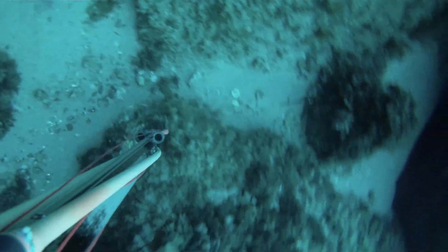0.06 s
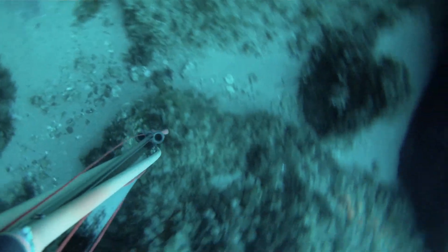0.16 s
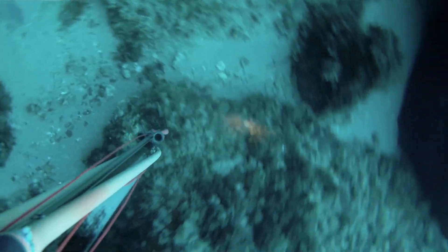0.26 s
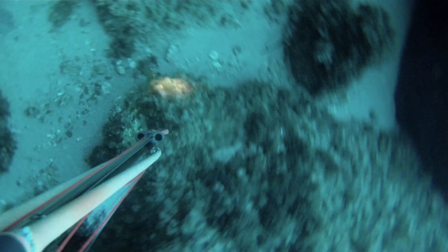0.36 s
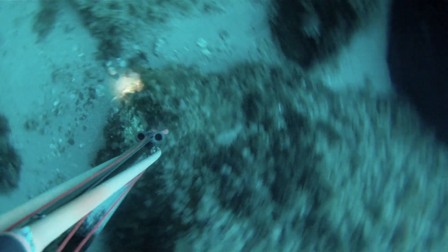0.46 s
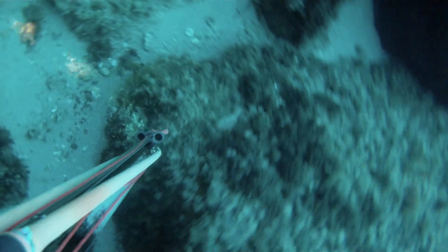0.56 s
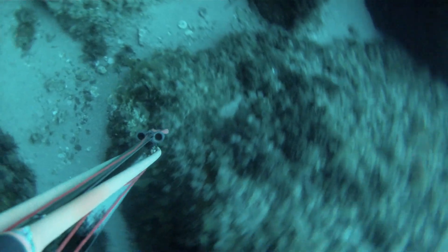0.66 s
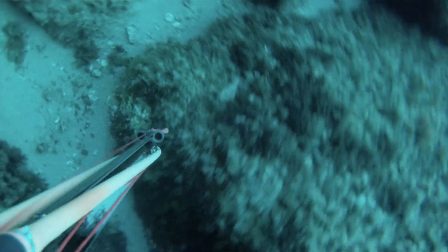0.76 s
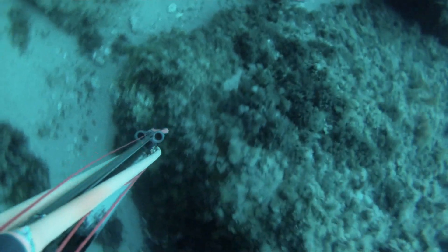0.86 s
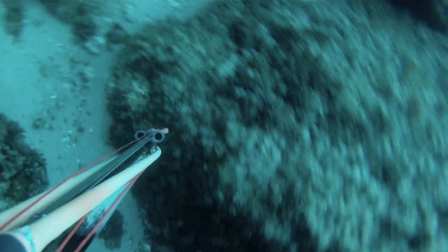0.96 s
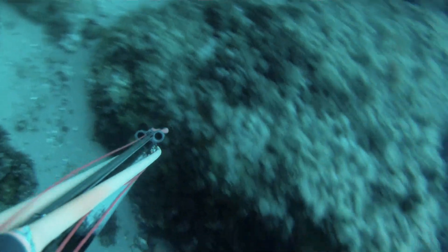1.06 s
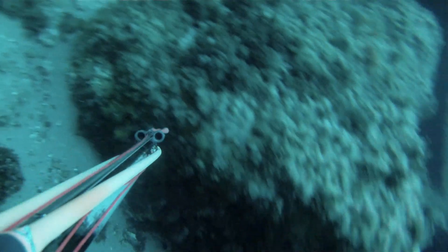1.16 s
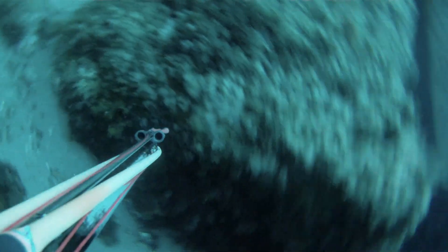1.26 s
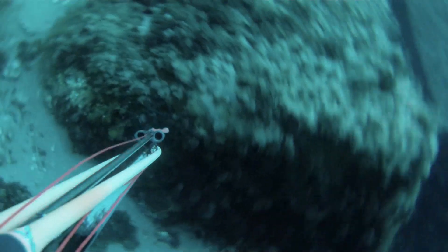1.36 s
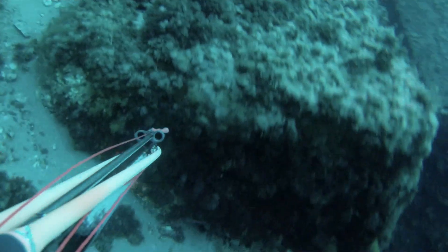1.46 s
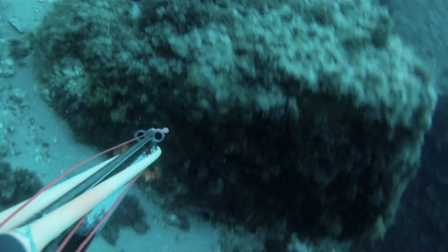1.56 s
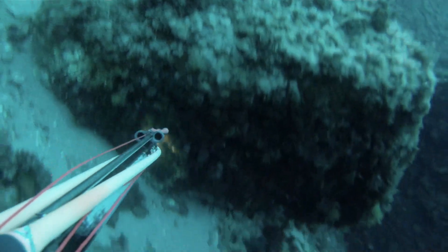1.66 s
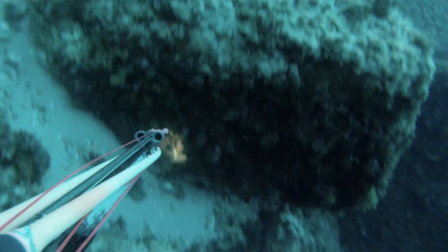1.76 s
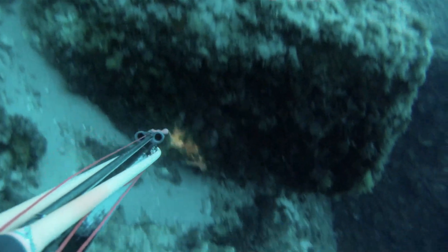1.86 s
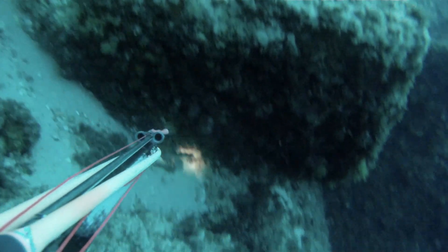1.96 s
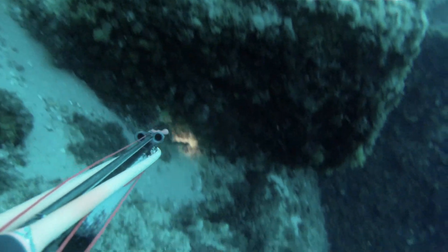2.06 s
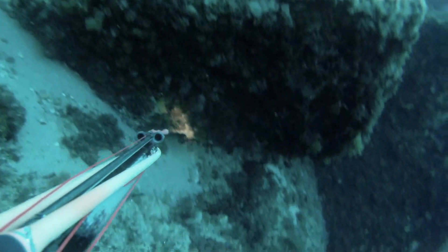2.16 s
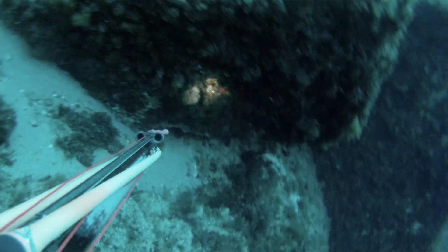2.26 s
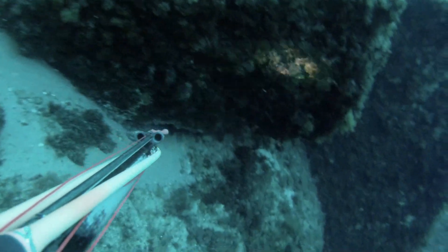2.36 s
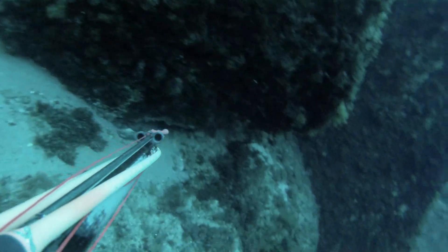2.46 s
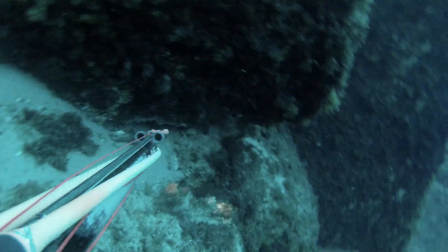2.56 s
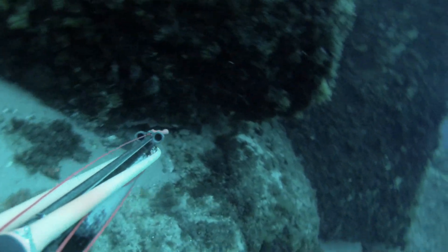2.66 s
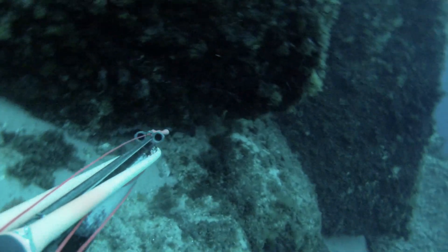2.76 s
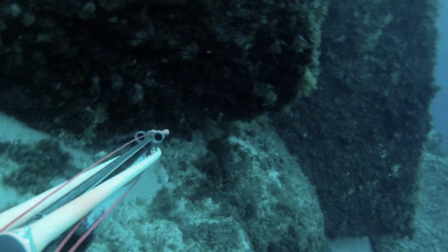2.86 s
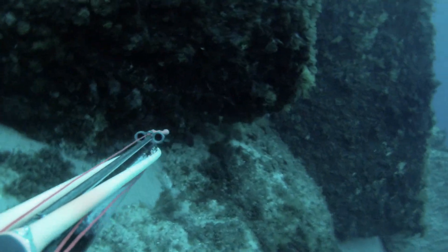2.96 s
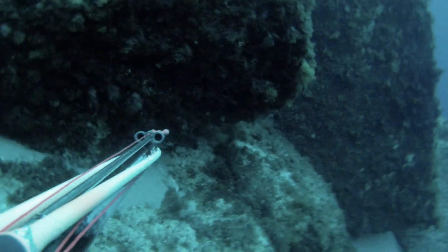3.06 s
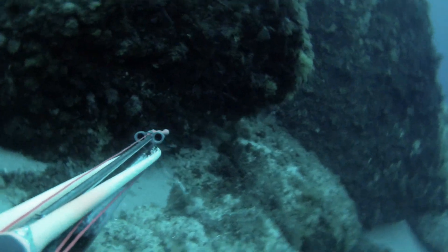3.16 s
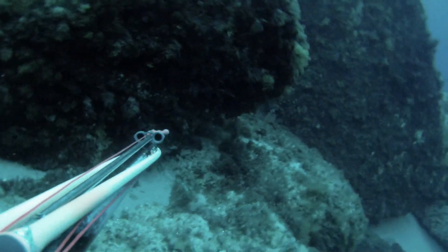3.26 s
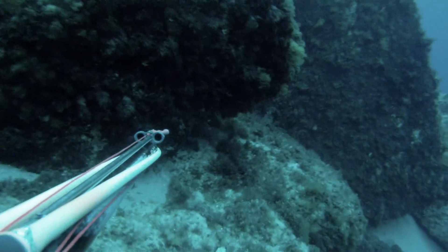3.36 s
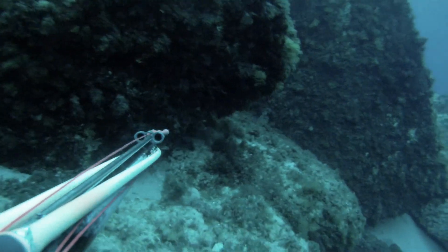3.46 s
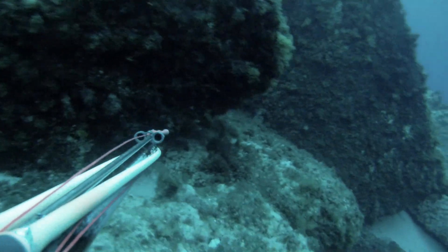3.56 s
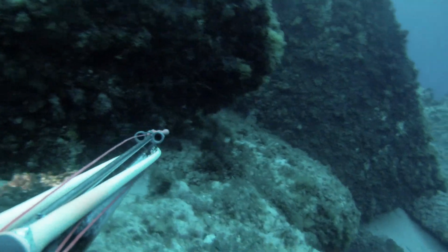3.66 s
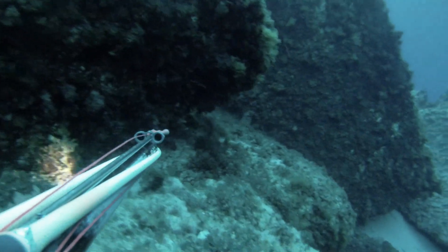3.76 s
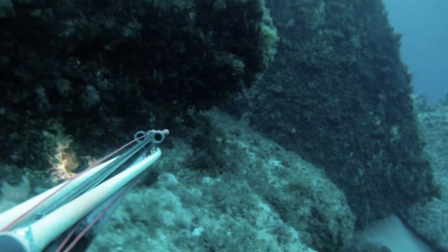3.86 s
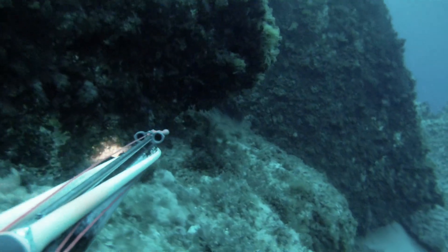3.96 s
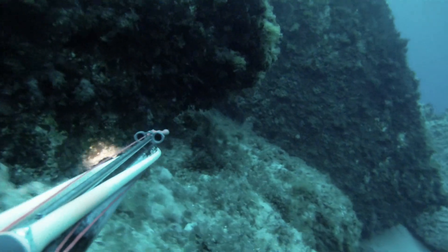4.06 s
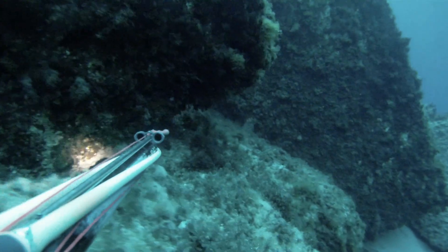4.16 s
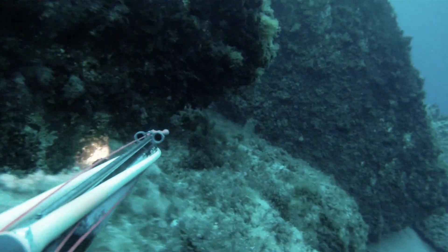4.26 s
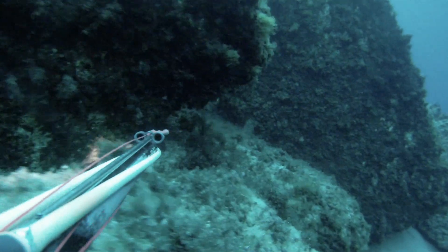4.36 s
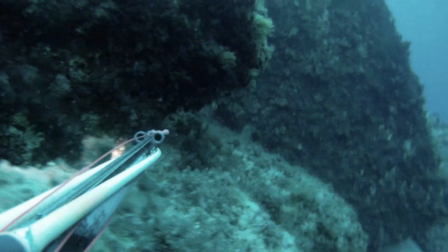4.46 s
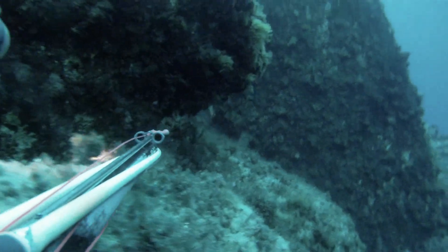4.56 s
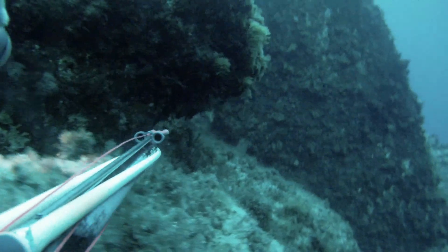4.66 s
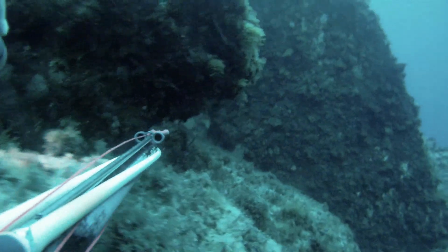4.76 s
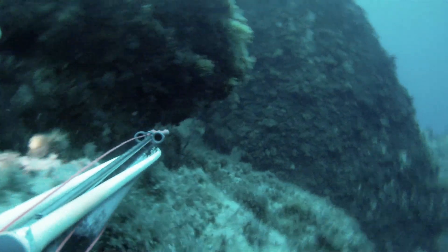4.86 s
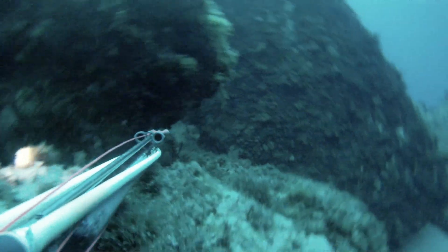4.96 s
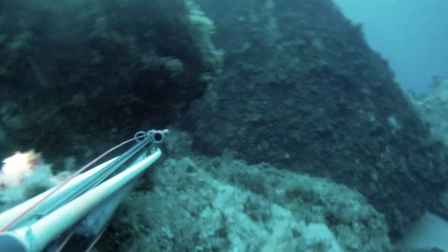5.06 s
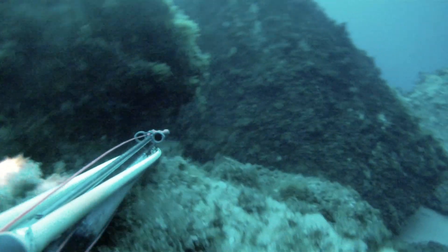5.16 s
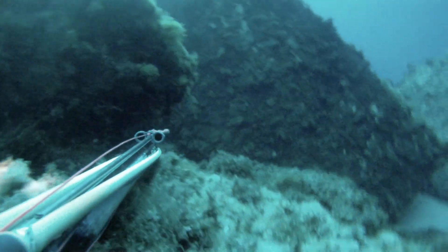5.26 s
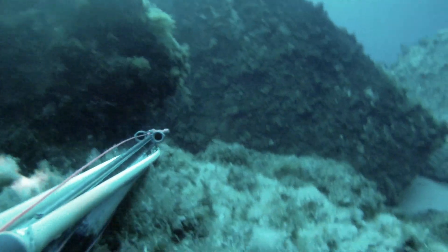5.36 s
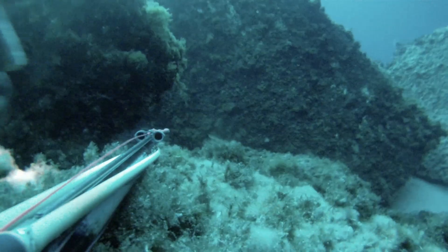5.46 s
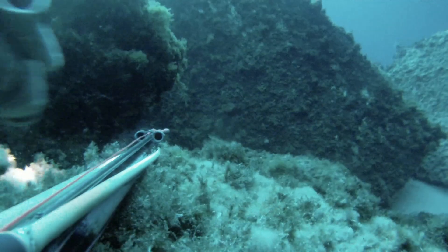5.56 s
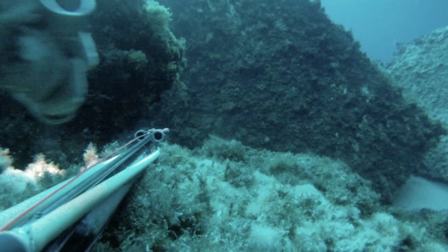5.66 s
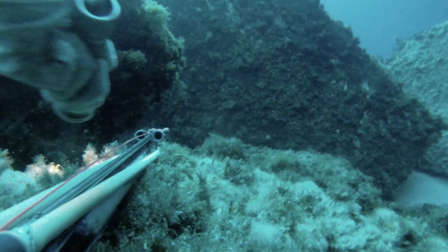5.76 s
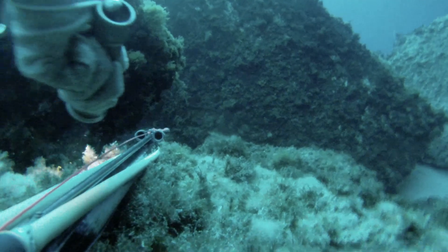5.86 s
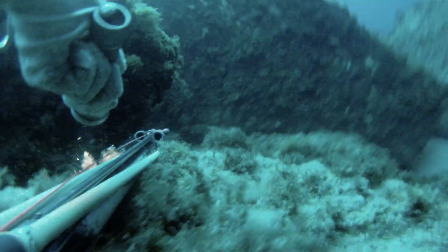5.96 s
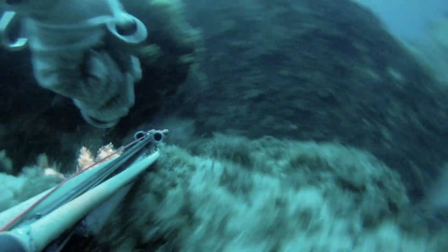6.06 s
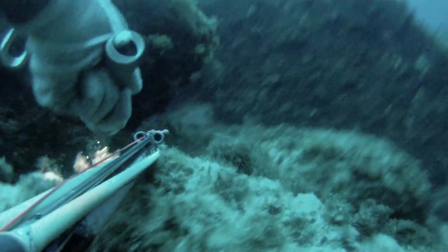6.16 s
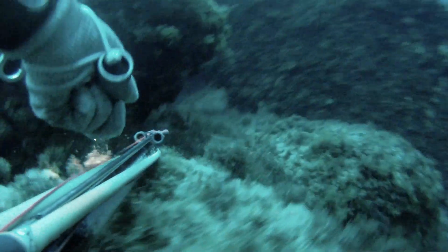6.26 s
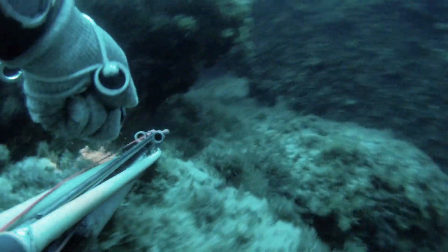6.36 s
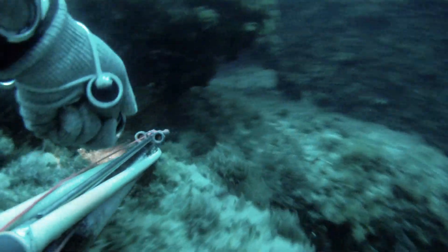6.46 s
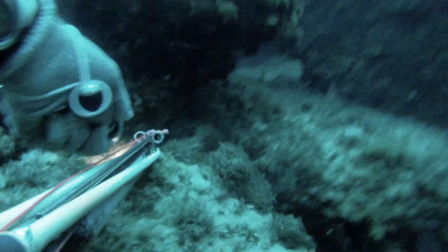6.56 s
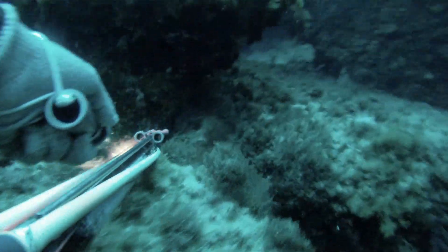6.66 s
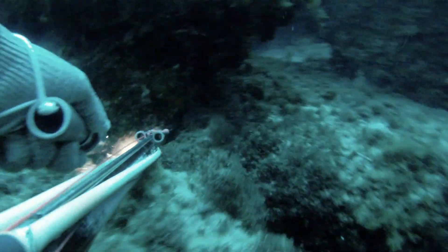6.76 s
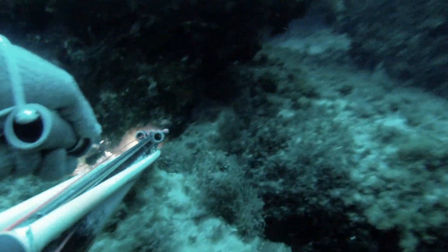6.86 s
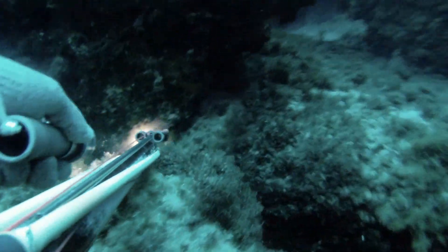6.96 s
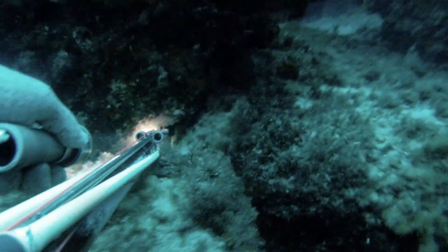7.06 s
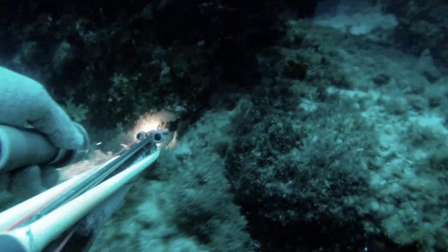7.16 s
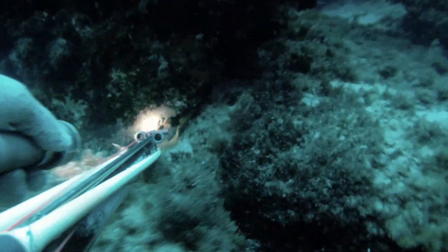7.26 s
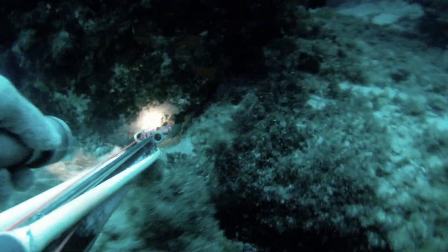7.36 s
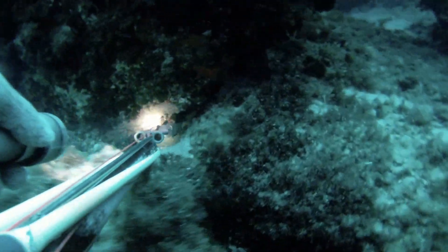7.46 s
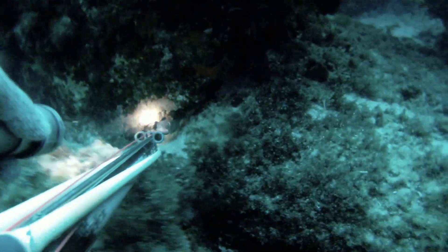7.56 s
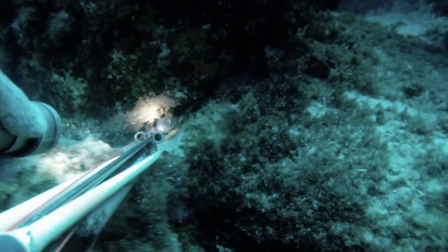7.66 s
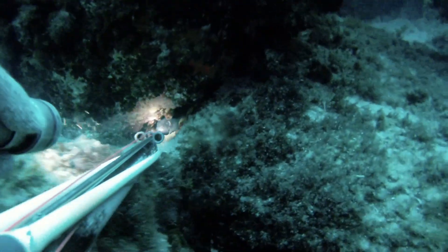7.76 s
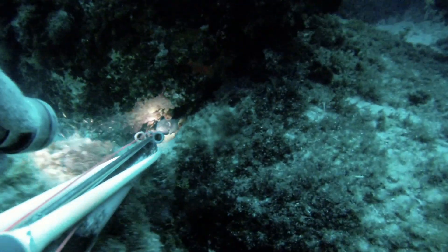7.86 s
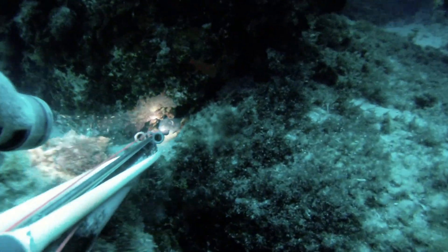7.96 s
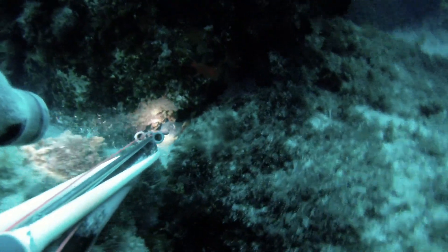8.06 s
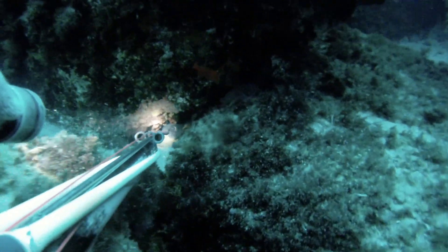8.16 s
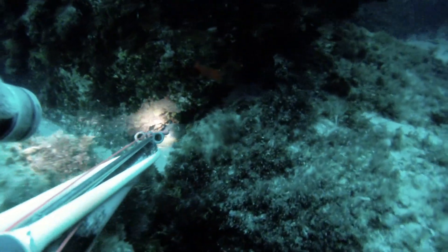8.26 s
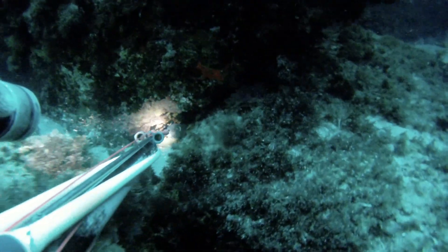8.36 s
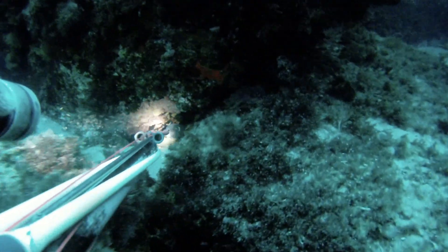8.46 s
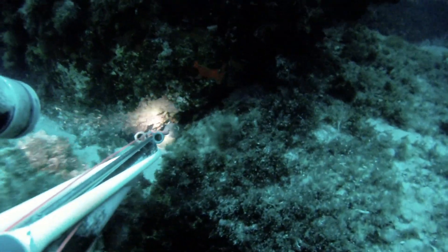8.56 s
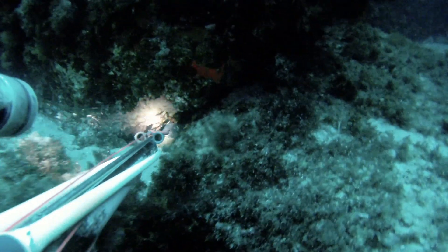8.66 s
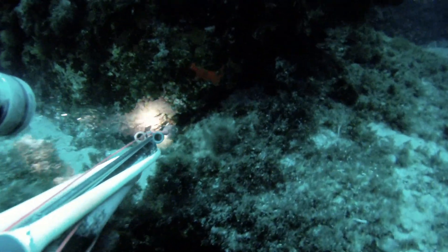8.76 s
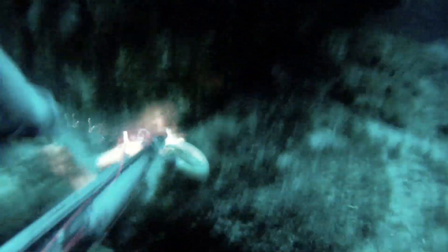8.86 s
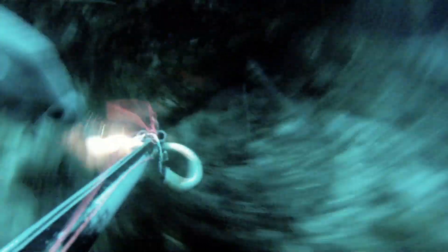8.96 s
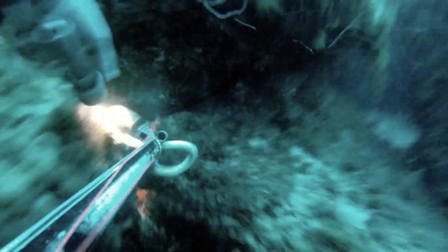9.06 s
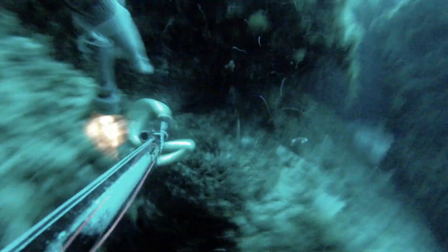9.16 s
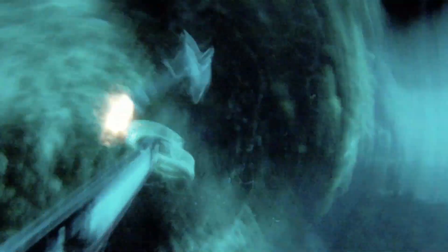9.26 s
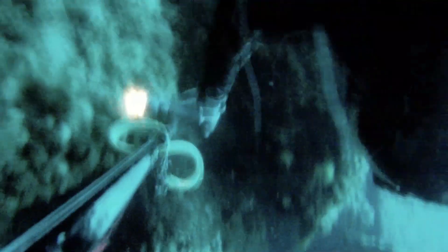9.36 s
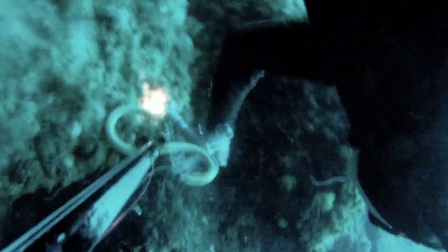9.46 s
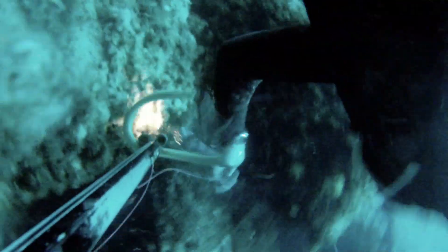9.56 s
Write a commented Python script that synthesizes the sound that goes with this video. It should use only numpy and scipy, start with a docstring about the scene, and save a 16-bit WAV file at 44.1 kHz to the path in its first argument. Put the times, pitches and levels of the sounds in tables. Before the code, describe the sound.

Sparse shrimp clicks over a thin ringing hiss underwater, a brief handling scuffle, then a sudden speargun shot with metallic clatter and a second burst.

```python
"""Snapping shrimp crackle over a ringing sea wash, then a speargun cracks, scrapes and clatters.
The gun is carried over a rocky sea bed, heard from a camera in a waterproof housing.
Random clicks and noise through resonances make the reef and the rubbing, knocking glove.
The trigger release is two bare pulses; dense clicks scrape the shaft down the barrel and run out the line.
Scattered blows clatter on the gun, unsteady gliding sines squeak and chirp, a low sine flaps as loose bands.
"""
import sys
import numpy as np
from scipy import signal
from scipy.fft import rfft, irfft
from scipy.io import wavfile
from scipy.ndimage import uniform_filter1d

SR = 44100
rng = np.random.default_rng(int(sys.argv[2]) if len(sys.argv) > 2 else 0)


def digitize_waveform(pressure):
    """Quantize a signal to 16-bit integers and store it at the path in sys.argv[1].

    Rows of a 2-D input are taken as channels; values are limited to [-1, 1].
    """
    field = np.atleast_2d(pressure).T
    bounded = np.clip(field, -1, 1)
    quanta = np.round(bounded * 32767).astype(np.int16)
    wavfile.write(sys.argv[1], SR, quanta)


N = 423351
TIME = np.arange(N) / SR

# Levels in the tables stand before any trim or share in the functions. A rise is the time to climb 30 dB.

# Resonances of the camera housing. Each row: frequency in Hz, width in Hz, level over the direct sound in dB.
HOUSING = [(508.2, 43, 12.5), (680, 21, 4.5), (1290, 250, -5.5), (1713, 70, 11), (2000, 370, 3),
           (3330, 218, 9.5), (4960, 410, -5), (7770, 610, -1), (8970, 320, -4)]
# Resonances of barrel and shaft. Each row: frequency in Hz, width in Hz, level over the direct sound in dB.
GUN = [(281, 25, -2), (453, 18, 8), (508, 20, 13), (580, 20, 2), (637, 20, 10), (683, 22, 11), (730, 8, 8),
       (1233, 26, 2), (1484, 45, 6), (1664, 26, 5), (1714, 22, 12), (2050, 90, 1), (3436, 30, 3),
       (3589, 20, 1), (3738, 22, 2), (3985, 35, 3), (4440, 100, -2), (4880, 30, 0)]
# Resonances of handle and camera mount. Each row: frequency in Hz, width in Hz, level in dB.
MOUNT = [(124, 83, -4.5), (260, 120, -7.5), (512, 46, 11.5), (653, 43, 11), (885, 33, -5), (1295, 116, 6.5),
         (1684, 130, 1.5), (2050, 140, 1), (3460, 165, 3), (4560, 470, -14), (5900, 300, -4.5)]

# Spectral colour of the sea's wash. Each row: frequency in Hz, level in dB.
SEA_COLOUR = [(12, -31), (26, 11), (37, 21), (55, -1.5), (130, -2.5), (300, 0), (900, 2), (2500, 0),
              (6000, -3), (11000, -3.5), (13000, -10), (16000, -6)]
# Spectral colour of the rubbing glove. Each row: frequency in Hz, level in dB.
RUB_COLOUR = [(25, 6.5), (400, 8), (2200, -0.5), (2750, -5), (3500, -3.5), (6400, -11), (7500, -15),
              (15000, -36)]
# Spectral colour of moving water. Each row: frequency in Hz, level in dB.
FLOW_COLOUR = [(12, -38), (26, -8.5), (38, 1.5), (60, -10.5), (130, -19), (300, -33.5), (800, -42)]
# Spectral colour of the lightly sliding hand. Each row: frequency in Hz, level in dB.
SLIDE_COLOUR = [(200, -8), (400, -5), (510, 1), (640, -6.5), (950, -8), (1400, -8.5), (1750, -13.5),
                (2200, -13), (3000, -18), (8000, -40)]
# Spectral colour of dull bumps. Each row: frequency in Hz, level in dB.
KNOCK_COLOUR = [(30, 13), (150, 5), (1000, -0.5), (2200, -7), (3000, -8.5), (7000, -18), (15000, -22)]
# Spectral colour of hard blows. Each row: frequency in Hz, level in dB.
CLACK_COLOUR = [(25, -6), (130, -5.5), (350, -0.5), (900, -0.5), (1500, 0.5), (2600, -3.5), (4500, 0),
                (6500, -9), (10500, -9), (15000, -14)]
# Spectral colour of scraping. Each row: frequency in Hz, level in dB.
SCRAPE_COLOUR = [(25, 8.5), (130, -3), (350, -6.5), (600, 6.5), (950, -1.5), (1500, 2), (2600, -7),
                 (3400, -4), (4500, -3), (6200, -8.5), (10500, -22), (13000, -31), (15500, -50)]
# Spectral colour of the recoil shudder. Each row: frequency in Hz, level in dB.
JOLT_COLOUR = [(20, -6), (60, -3), (128, 3), (190, -5.5), (400, -15.5), (900, -38.5)]

# The nearest shrimp. Each row: start in seconds, level in dB, bass and treble in dB against that level.
SNAPS = [(0.0214, -38.5, -5, -9.5), (1.1166, -59, 1, 5), (1.3344, -57, -1, 3), (1.62, -35.5, -1, -17),
         (1.8015, -58, -13, 6.5), (2.0722, -55.5, -15, -6), (2.2347, -50.5, -0.5, -17),
         (2.3491, -58.5, -8, 2), (2.4142, -55, -1.5, 9), (3.1677, -48.5, -10, -9), (4.1597, -47, -24, -8.5),
         (4.3034, -54, -18, -4), (4.334, -57, -19, -5), (5.894, -49.5, -17, -2), (6.1833, -49, -2.5, -5.5),
         (6.1953, -50, -20, -8), (6.3076, -57, -13, -1.5), (6.6024, -48.5, -5, -8), (6.8384, -52, -19, -12),
         (7.2386, -52, -4, -18), (7.2848, -45.5, -4, -8.5), (7.647, -53.5, -18, 1.5),
         (7.7505, -49, -25, -4), (7.7912, -45, -7, -13), (7.816, -52.5, 0, -5), (8.3928, -53.5, -8, 5),
         (8.7231, -51, -2.5, -6)]
# The rest of the colony, at random: mean and spread of level, bass and treble (both against level), in dB.
COLONY_MEAN_DB, COLONY_SPREAD_DB, COLONY_COUNT = (-65, -8, 4.5), (1.5, 4, 2.2), 44

# Glove strokes. Each row: full pressure in seconds, level in dB, rise in s, hold in s, extra rasp in dB.
GLOVE = [(5.263, -45.5, 0.057, .005, 5.5), (5.344, -40, 0.14, 0.036, 1), (5.466, -43.5, .09, 0.036, -1),
         (5.549, -41.5, .01, .02, -5), (5.634, -50.5, .06, .07, -3.5), (6.02, -51.5, 0.19, 0.024, 4),
         (7.27, -76, 0.54, .22, 10)]
GLOVE_FALL_DB_PER_S = 215
# The hand sliding along the gun: full pressure in seconds, level in dB, rise in s, hold in s, fall in dB/s.
HAND = (5.5, -67, 0.1, 1.65, 31)
# Surges of water as the diver moves. Each row: full flow in seconds, level in dB, rise in s, hold in s.
SURGES = [(0.8, -75.5, .8, 0.44), (1.95, -72.5, .6, .06), (5.26, -47, 0.074, 0.052), (6.02, -59.5, .2, .03),
          (6.502, -57, .45, .06), (6.8, -61, .2, 0.088), (7.658, -64.5, 0.22, .07), (8.0, -70, .3, .1)]
SURGE_FALL_DB_PER_S, STILL_WATER_DB = 85, -81
# Dull bumps of hand and gear. Each row: start in seconds, peak in dB, decay in s, low and top edge in Hz.
KNOCKS = [(1.335, -58, .006, 80, 400), (3.555, -61, 0.0074, 90, 250), (4.245, -54, 0.034, 120, 754),
          (4.925, -60, .01, 80, 253), (5.2931, -28.5, 0.0037, 50, 2500), (5.548, -24.5, 0.0025, 99, 5000),
          (5.563, -31.5, .003, 300, 7000), (5.752, -46.5, 0.0042, 200, 1480),
          (5.868, -48, 0.0096, 300, 1000), (6.008, -40, .003, 500, 3500), (6.228, -51.5, 0.013, 80, 494),
          (8.798, -37, 0.004, 60, 700)]

# Short squeaks and chirps, of wet rubber or a small bubble.
# Each row: start in seconds, peak in dB, length in s, starting and final pitch in Hz.
SQUEAKS = [(0.782, -60, 0.011, 5100, 5000), (5.29, -33, 0.0085, 2100, 1690),
           (9.121, -35.5, .012, 3700, 3370), (9.123, -39, .014, 2700, 2480),
           (9.169, -45, 0.035, 2680, 2820), (9.171, -49, 0.024, 3480, 3580),
           (9.185, -43, 0.0092, 2860, 2680)]
# Slack bands swinging: full swing in seconds, level in dB, rise in s, hold in s, fall in dB/s.
SWING = (9.34, -32, 0.15, .15, 55)
SWING_HZ = 38.1

# The gun bonking on the mount: start in seconds, peak in dB.
BONK = (2.7865, -32.5)
# Modes of the bonk. Each row: frequency in Hz, level in dB, time to die by 60 dB in s.
BONK_MODES = [(152, -17.5, 0.13), (258, -6, 0.092), (520, -3, 0.095), (643, 2.5, .05), (1233, -0.5, 0.033),
              (1300, -4, .025), (1760, -6.5, .025), (2160, -3.5, 0.017)]

# Shaft, bands and line striking the gun.
# Each row: start in seconds, peak in dB, decay in s, top edge in Hz, share of ring from 0 to 1.
CLACKS = [(8.8445, -38, .006, 2200, 0.7), (8.8567, -17, 0.0025, 5000, 0.6),
          (8.8683, -6, 0.0052, 13000, 0.22), (8.8750, -14.5, 0.0013, 1500, 0.17),
          (8.8924, 0, 0.0031, 3530, 0.7), (8.9092, 0, 0.0059, 2200, 1), (8.9255, -6, 0.0046, 9000, 0.5),
          (8.9324, -7.5, 0.0041, 3500, 0.8), (8.9643, -14.5, 0.0062, 9000, 0),
          (9.0020, -9.5, 0.0053, 2000, 1), (9.0306, -15.5, 0.0027, 4460, 1), (9.0670, -17, 0.0027, 5300, 1),
          (9.2020, -28, 0.0011, 7000, 0.6), (9.2200, -32.5, .004, 12000, 0),
          (9.2480, -28, 0.011, 1980, 0.9), (9.2840, -27, 0.0071, 2500, 0.9), (9.2975, -25, .003, 3500, .4),
          (9.312, -11, 0.00065, 880, 0.17), (9.3140, -16, 0.00062, 1390, 0.04),
          (9.3222, -18, 0.0036, 3000, 0.7), (9.3498, -12, 0.0023, 13800, 0.17),
          (9.3797, -16, 0.0075, 4000, 0.07), (9.3852, -8.5, 0.0011, 2500, 0.1),
          (9.3925, -4, 0.0061, 6200, 0), (9.3978, -7.5, 0.0028, 14000, 0.06),
          (9.4155, -18, 0.0045, 4000, 0), (9.4535, -21, 0.0026, 1500, 0),
          (9.4920, -26.5, 0.0026, 12000, 0.05)]
# The trigger's double crack. Each row: start in seconds, peak in dB, pulse length in s.
CRACKS = [(8.8614, 6, 0.00012), (8.8619, 7.5, 0.00018)]
# The gun jolting the camera. Each row: full force in seconds, level in dB, rise in s, hold in s.
JOLTS = [(8.858, -37.5, 0.023, 0.112), (9.304, -33.5, 0.098, 0.17)]
JOLT_FALL_DB_PER_S = 340
# The gun trembling in the hand: full force in seconds, level in dB, rise in s, hold in s, fall in dB/s.
TREMBLE = (9, -56.5, .1, .68, 40)

# The bands drive the shaft for DRIVE_S, then it coasts until clear of the muzzle.
LAUNCH_S, DRIVE_S, CLEAR_S = 8.895, .04, 9.14
DRIVE_DB, DRIVE_FALL_DB_PER_S = -12.5, 357
COAST_DB, COAST_FALL_DB_PER_S = -21.5, 66

# The line paying out: full speed in seconds, level in dB, rise in s, hold in s, fall in dB/s.
LINE = (9.262, -40, .16, 0.2, 175)
# The line jerking taut: time in seconds, level in dB, rise in s, hold in s, fall in dB/s.
# Its negative hold starts the fall before the rise is done.
JERK = (9.398, -26, 0.0427, -0.0128, 430)

# Stereo difference. Each row: frequency in Hz, level in dB against the common sound.
APART = [(30, -50), (70, -32), (140, -27), (500, -34), (1100, -30), (1800, -29), (4500, -22), (9000, -21),
         (15000, -18)]
EDGE_HZ = 15400


def amp(db):
    """Turns decibels into gain."""
    return 10 ** (np.asarray(db) / 20)


def evened(x):
    """Scales a sound to rms 1."""
    return x / np.sqrt(np.mean(x ** 2) + 1e-20)


def at_peak(x, db):
    """Scales a hit so that its strongest millisecond has the height of a sine peaking at db."""
    loudest_power = uniform_filter1d(x ** 2, size=44).max()
    return amp(db) * x / np.sqrt(2 * loudest_power + 1e-20)


def add(mix, s, sound):
    """Drops a sound into the mix at s seconds."""
    part = mix[round(s * SR):][:len(sound)]
    part += sound[:len(part)]


def band(x, hz, kind, order=2):
    """Shapes a sound with a Butterworth filter."""
    return signal.sosfilt(signal.butter(order, hz, kind, fs=SR, output="sos"), x)


def colour(x, points):
    """Gives a sound a drawn spectrum, with minimum phase so nothing smears ahead of a hit."""
    hz, db = np.transpose(points)
    size = 2 ** 13
    log_hz = np.log(abs(np.fft.fftfreq(size, 1 / SR)) + 1)
    log_gain = np.log(amp(np.interp(log_hz, np.log(hz), db)))
    response = np.exp(np.conj(signal.hilbert(log_gain)))
    taps = np.fft.ifft(response).real[:size // 2]
    return signal.fftconvolve(x, taps)[:len(x)]


def ring(x, modes):
    """Gives only what a set of decaying resonances adds to the direct sound."""
    t = np.arange(SR // 5) / SR
    taps = np.zeros(len(t))
    for hz, width_hz, db in modes:
        decay = np.exp(-np.pi * width_hz * t)
        taps += amp(db) * 2 * np.pi * width_hz / SR * decay * np.cos(2 * np.pi * hz * t)
    return signal.fftconvolve(x, taps)[:len(x)]


def housed(x):
    """Adds the ringing of the housing to a direct sound."""
    return x + ring(x, HOUSING)


def grains(per_s, spread_db):
    """Scatters random clicks of either sign, a few much larger than the rest."""
    size = amp(spread_db * np.minimum(rng.exponential(1, N), 4))
    sign = rng.choice([-1, 1], N)
    return evened(size * sign * (rng.random(N) < per_s / SR))


def burst(decay_s):
    """Scatters a blow into a quickly dying cluster of pressure spikes."""
    t = np.arange(SR // 6) / SR
    return rng.choice([-1., 1.], len(t)) * np.exp(-t / decay_s)


def blow(decay_s, direct_share):
    """Makes one clean push plus its scatter, sharing the energy between them."""
    cluster = burst(decay_s)
    push = np.sqrt(direct_share) * signal.unit_impulse(len(cluster))
    return push + np.sqrt(1 - direct_share) * cluster / np.linalg.norm(cluster)


def swell(s, db, rise_s, hold_s, fall_db_per_s):
    """A gain that climbs 30 dB in rise_s to reach db at s, holds, then dies away."""
    early = np.maximum(s - TIME, 0)
    late = np.maximum(TIME - s - hold_s, 0)
    drop_db = 30 * early / rise_s + fall_db_per_s * late
    return amp(db - np.minimum(drop_db, 200))


def waver(per_s, depth_db):
    """A gain that wanders by chance between per_s random points a second."""
    points = rng.standard_normal(2 ** 12)
    return amp(depth_db * np.interp(TIME * per_s, np.arange(len(points)), points))


def sea(wash_db=-68.0, crackle_db=-76):
    """Far shrimp merge into a wash that keeps the housing singing; nearer ones crackle."""
    wash = housed(colour(rng.standard_normal(N), SEA_COLOUR))
    clicks = grains(per_s=70, spread_db=4.0)
    crackle = signal.oaconvolve(clicks, burst(decay_s=0.0012))[:N]
    crackle = housed(band(crackle, [2200, 11500], "bandpass"))
    return amp(wash_db) * evened(wash) + amp(crackle_db) * evened(crackle)


def shrimp(bass_trim_db=-1, treble_trim_db=2, ring_share=1.7):
    """Each claw snap is smeared over a few milliseconds by the rocks and pings the housing."""
    out = np.zeros(N)
    times = rng.uniform(0, N / SR, COLONY_COUNT)
    levels = COLONY_MEAN_DB + COLONY_SPREAD_DB * rng.standard_normal((COLONY_COUNT, 3))
    colony = np.column_stack([times, levels])
    for s, db, bass_db, treble_db in np.vstack([SNAPS, colony]):
        snap = blow(decay_s=0.0053, direct_share=0.11)
        ping = snap + ring_share * ring(snap, HOUSING)
        bass = band(ping, [1350, 2300], "bandpass")
        middle = band(ping, [2700, 5400], "bandpass")
        treble = band(housed(burst(decay_s=0.003)), [7000, 11500], "bandpass", order=3)
        add(out, s, at_peak(bass, db + bass_db + bass_trim_db))
        add(out, s, at_peak(middle, db))
        add(out, s, at_peak(treble, db + treble_db + treble_trim_db))
    return out


def rubbing(pressure, trim_db=-1):
    """The glove sticks and slips, shaking handle and mount; each stroke has its own share of rasp."""
    rasp_gain = amp([stroke[-1] for stroke in GLOVE])[:, None]
    rasp = (pressure * rasp_gain).max(0)
    slips = ring(colour(grains(per_s=3500, spread_db=3.5), RUB_COLOUR), MOUNT)
    slips = evened(slips) * waver(per_s=110, depth_db=1.5)
    low = band(slips, 900, "lowpass", order=1)
    return amp(trim_db) * (pressure.max(0) * low + rasp * (slips - low))


def sliding(touch, trim_db=-1):
    """A lightly sliding hand makes dense small slips that ring the housing."""
    slips = evened(housed(colour(grains(per_s=3000, spread_db=2.5), SLIDE_COLOUR)))
    return amp(trim_db) * touch * waver(per_s=14, depth_db=2.1) * slips


def water(pressure, touch, trim_db=-2, glove_stir_db=-17, hand_stir_db=-5):
    """Movement stirs low turbulence round the housing, over a faint wandering flow."""
    surges = [swell(*surge, SURGE_FALL_DB_PER_S) for surge in SURGES]
    stirred = [amp(glove_stir_db) * pressure.max(0), amp(hand_stir_db) * touch]
    flow = np.max(surges + stirred, axis=0)
    still = amp(STILL_WATER_DB) * waver(per_s=5, depth_db=2.2)
    turbulence = band(colour(rng.standard_normal(N), FLOW_COLOUR), 5000, "lowpass")
    return amp(trim_db) * np.hypot(flow, still) * evened(turbulence)


def knocks(trim_db=-1):
    """Dull bumps of hand and gear are blows heard through the resonances of the mount."""
    out = np.zeros(N)
    for s, db, decay_s, low_hz, top_hz in KNOCKS:
        bump = ring(colour(blow(decay_s, direct_share=0.58), KNOCK_COLOUR), MOUNT)
        bump = band(bump, low_hz, "highpass")
        bump = band(bump, top_hz, "lowpass", order=3)
        add(out, s, at_peak(bump, db + trim_db))
    return out


def handling():
    """Glove and hand rub the gear, stir the water and bump things."""
    pressure = np.array([swell(*stroke[:4], GLOVE_FALL_DB_PER_S) for stroke in GLOVE])
    touch = swell(*HAND)
    return water(pressure, touch) + rubbing(pressure) + sliding(touch) + knocks()


def squeaks(jitter=0.021):
    """Short squeaks and chirps, of wet rubber or a small bubble, are unsteady gliding sines."""
    out = np.zeros(N)
    for s, db, length_s, start_hz, end_hz in SQUEAKS:
        hz = np.linspace(start_hz, end_hz, int(length_s * SR))
        wobble = evened(uniform_filter1d(rng.standard_normal(SR // 10), size=40))
        hz = hz * (1 + jitter * wobble[:len(hz)])
        tone = np.sin(2 * np.pi * np.cumsum(hz) / SR)
        add(out, s, amp(db) * np.hanning(len(hz)) * tone)
    return out


def bonk(contact_s=0.0027):
    """The gun softly meets the mount; the contact swells into a few dying modes."""
    t, out = np.arange(SR // 4) / SR, np.zeros(N)
    tone = sum(amp(db - 60 * t / t60) * np.sin(2 * np.pi * hz * t) for hz, db, t60 in BONK_MODES)
    s, db = BONK
    add(out, s, at_peak(tone * (1 - np.exp(-t / contact_s)), db))
    return out


def clacks(trim_db=-1.0):
    """Hard blows on the gun; each sets barrel and housing ringing by its own share."""
    out = np.zeros(N)
    for s, db, decay_s, edge_hz, share in CLACKS:
        hit = band(colour(blow(decay_s, direct_share=0.27), CLACK_COLOUR), edge_hz, "lowpass")
        add(out, s, at_peak(hit + share * ring(hit, HOUSING + GUN), db + trim_db))
    return out


def release(recoil_trim_db=-1):
    """Two bare pressure shocks, and the low shudder of the recoil over a lasting tremble of the gun."""
    jolts = [swell(*jolt, JOLT_FALL_DB_PER_S) for jolt in JOLTS]
    shudder = np.max(jolts + [swell(*TREMBLE)], axis=0)
    out = amp(recoil_trim_db) * shudder * evened(colour(rng.standard_normal(N), JOLT_COLOUR))
    for s, db, length_s in CRACKS:
        u = np.arange(SR // 200) / SR / length_s
        add(out, s, amp(db) * (1 - u) * np.exp(-u))  # a push, then a weaker suction
    return out


def scrape(force, body_db, treble_db, slips_per_s, spread_db, ring_share, fizz_db, brightening, dulling):
    """Dense tiny impacts on the gun; a harder run is brighter, and as it slows the top fizz fades first."""
    slips = colour(grains(slips_per_s, spread_db), SCRAPE_COLOUR)
    sound = slips + ring_share * ring(slips, HOUSING + GUN)
    body = evened(band(sound, 2530, "lowpass", order=4))
    edge = evened(band(sound, [3000, 8000], "bandpass", order=3))
    fizz = evened(band(sound, 10600, "highpass", order=4))
    speed = force / force.max()
    top_gain = amp(treble_db) * speed ** brightening
    top = edge + amp(fizz_db) * speed ** dulling * fizz
    return force * (amp(body_db) * body + top_gain * top)


def on_barrel(leave_db_per_s=230):
    """A gain of 1 while the shaft touches the gun, fading as its tail leaves."""
    return swell(LAUNCH_S, 0, .003, CLEAR_S - LAUNCH_S, leave_db_per_s)


def shaft():
    """The shaft scrapes hard under the pull of the bands, then more and more lightly until it is clear."""
    drive = swell(LAUNCH_S, DRIVE_DB, 0.0034, DRIVE_S, DRIVE_FALL_DB_PER_S)
    coast = swell(LAUNCH_S, COAST_DB, .003, 0, COAST_FALL_DB_PER_S)
    coast = coast * on_barrel() * waver(per_s=80, depth_db=2.5)
    driven = scrape(drive, body_db=-4, treble_db=-11, slips_per_s=3000, spread_db=3.5,
                    ring_share=0.62, fizz_db=-6, brightening=.03, dulling=0.17)
    coasting = scrape(coast, body_db=-4, treble_db=-12.5, slips_per_s=1800, spread_db=3.5,
                      ring_share=0.79, fizz_db=-9, brightening=.55, dulling=0.26)
    return driven + coasting


def zing(shaft_db=-60, muzzle_db=-52):
    """The steel shaft sings thinly until it is clear; the muzzle rings on after the line snaps taut."""
    song = evened(band(rng.standard_normal(N), [6800, 8400], "bandpass", order=3))
    after = evened(band(rng.standard_normal(N), [4400, 5300], "bandpass", order=3))
    muzzle = after * swell(JERK[0], muzzle_db, rise_s=.003, hold_s=0, fall_db_per_s=90)
    return amp(shaft_db) * song * on_barrel(leave_db_per_s=700) + muzzle


def line(tick_db=-51):
    """The line rushes unevenly off the gun, ticking against it, and jerks taut."""
    run = swell(*LINE)
    force = np.hypot(run * waver(per_s=70, depth_db=1.8), swell(*JERK))
    rush = scrape(force, body_db=1, treble_db=1, slips_per_s=2000, spread_db=4,
                  ring_share=0.41, fizz_db=-8.5, brightening=0.66, dulling=.05)
    ticks = signal.oaconvolve(grains(per_s=110, spread_db=3.5), burst(decay_s=.0018))[:N]
    ticks = band(colour(ticks, CLACK_COLOUR), 1500, "highpass")
    return rush + amp(tick_db) * run / run.max() * evened(ticks)


def bands(trim_db=-1):
    """The released rubber bands flap slowly as a low sine."""
    return amp(trim_db) * swell(*SWING) * evened(np.sin(2 * np.pi * SWING_HZ * TIME))


def scene():
    """Mixes all the sounds, then spreads them over two microphones moving slightly out of phase."""
    mid = sea() + shrimp() + handling() + squeaks() + bonk()
    mid += clacks() + release() + shaft() + zing() + line() + bands()
    hz, db = np.transpose(APART)
    log_hz = np.log(np.fft.rfftfreq(N, 1 / SR) + 1)
    lead = 1j * amp(np.interp(log_hz, np.log(hz), db))  # a quarter turn of phase
    side = irfft(lead * rfft(mid), N)
    return np.array([mid + side, mid - side])


def record(dry, hiss_db=-73.0, own_hiss_db=-84):
    """Adds electronic hiss, shared and per channel, then soft overload and the band limit."""
    hiss = amp(hiss_db) * rng.standard_normal(N) + amp(own_hiss_db) * rng.standard_normal((2, N))
    loaded = np.tanh(dry + hiss)
    taps = signal.firwin(511, EDGE_HZ, window=("kaiser", 9), fs=SR)
    return signal.oaconvolve(loaded, taps[None], "same")


dry = scene()
out = record(dry)
digitize_waveform(out)
```